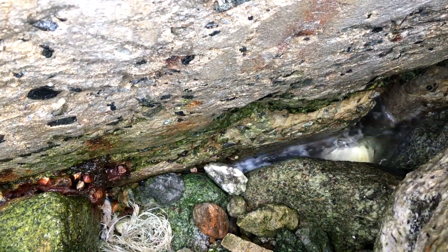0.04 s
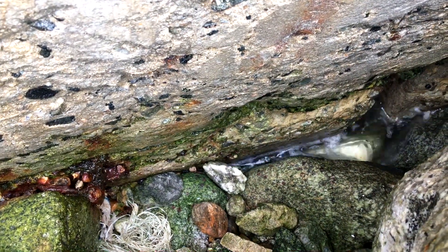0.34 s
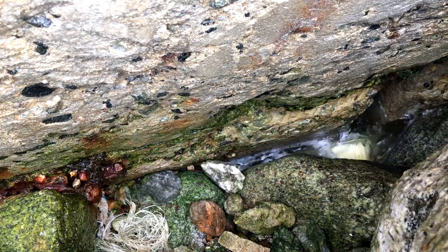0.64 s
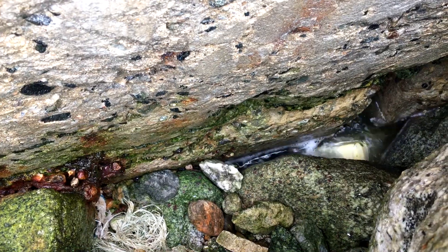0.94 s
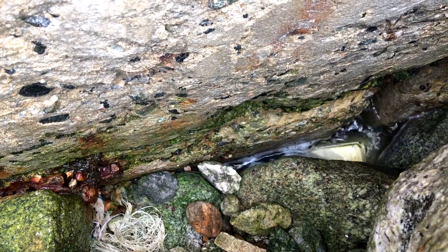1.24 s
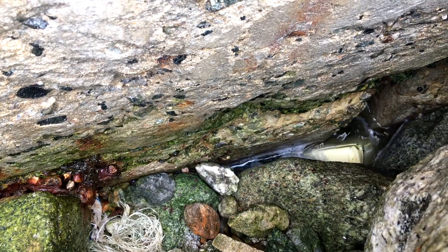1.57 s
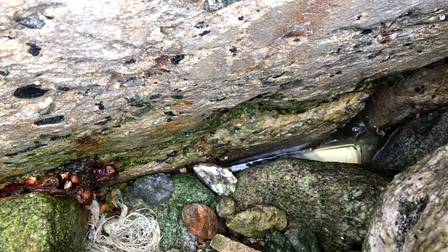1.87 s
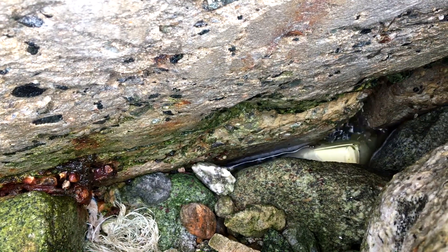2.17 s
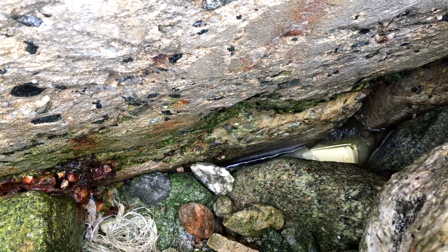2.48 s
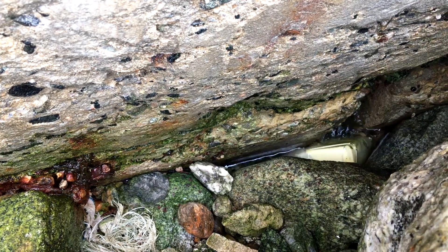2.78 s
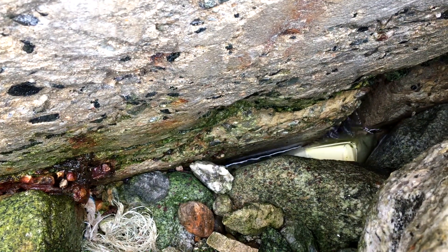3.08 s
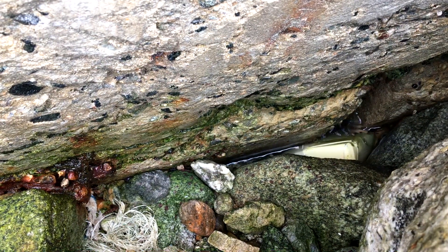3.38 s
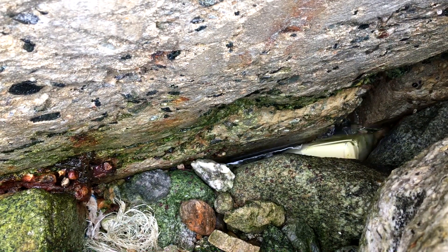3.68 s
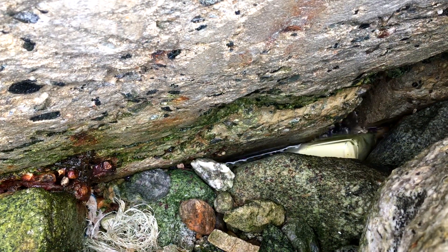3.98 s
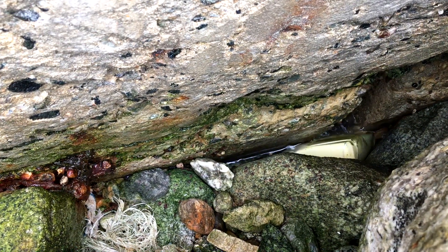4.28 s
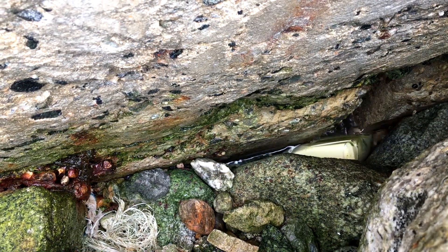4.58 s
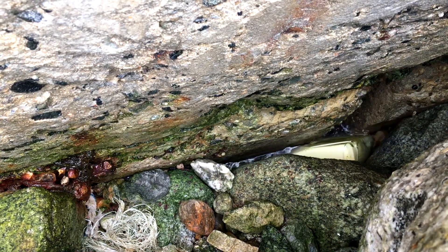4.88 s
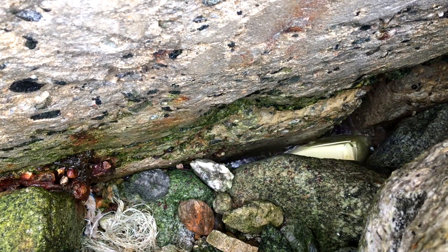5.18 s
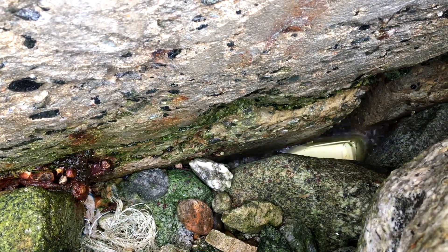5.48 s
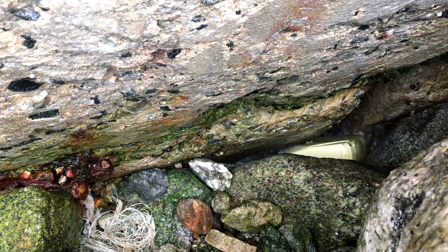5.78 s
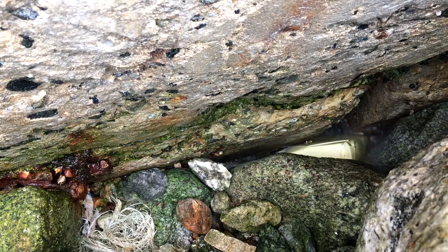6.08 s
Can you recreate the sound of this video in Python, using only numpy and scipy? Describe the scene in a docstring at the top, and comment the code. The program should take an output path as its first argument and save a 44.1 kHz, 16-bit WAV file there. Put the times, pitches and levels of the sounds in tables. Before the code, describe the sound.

Close above a narrow gap between shore boulders, foam fizzes lightly and drops slap on water and stone. A low swell gurgles through the hollows beneath with a rumble and a few deep gulps, then drains away with small plips. Near the end a bigger wave surges in, booming and churning, with splashing and a bright hiss of foam. The open sea is a faint, dull wash behind.

```python
"""Foam fizzes and spits in a narrow cleft between shore boulders, just below the microphone.
A low swell gurgles through the hollows under the rocks and drains away with a few plips; then a bigger
wave surges in, booming and splashing. Turbulent water rings the air in the hollows and in the gap,
clouds of ringing bubbles make the splash and fizz, and drops slap on water and stone.
Farther out, the open sea is a faint, steady wash."""
import sys
import numpy as np
from scipy import signal
from scipy.fft import rfft, irfft, next_fast_len
from scipy.io import wavfile
from scipy.ndimage import uniform_filter1d

SR = 44100
rng = np.random.default_rng(int(sys.argv[2]) if len(sys.argv) > 2 else 0)


def store_wav(level_fs):
    """Save 16-bit WAV to argv[1]."""
    pcm = np.round(np.clip(np.atleast_2d(level_fs), -1, 1) * 32767)
    wavfile.write(sys.argv[1], SR, pcm.T.astype(np.int16))


N = 270465
TIME = np.arange(N) / SR

# the low swell and the big wave, with the levels they rise towards before the trims in scene():
# (arrival [s], rise [s], rumble [dB], boom [dB], churning [dB], splashing [dB], foam [dB])
WAVES = [(0.6, 0.36, -29, -33, -44, -53, -65), (4.783, 0.3, -25, -17.5, -31, -34, -38)]
# water shutting air pockets under the boulders: (time [s], rumble [dB], boom [dB])
GULPS = [(0.06, -42, -66), (0.88, -36, -49), (1.44, -33.5, -31), (2.039, -35, -33.5), (2.68, -38, -45),
         (3.44, -48, -37.5), (3.85, -58, -37.5), (4.97, -29, -34), (6.0, -23, -31.5)]

# resonances: (pitch [Hz], width [Hz], relative level [dB])
HOLLOW_MODES = [(104.65, 15.7, 3), (142, 17, -12.5), (200.8, 22.2, -10), (220.5, 20.5, -14.5)]   # air in the big hollows under the boulders
SURF_MODES = [(52.1, 18.2, -2.5), (65.2, 11.2, 2)]   # the low end of the surf
GAP_LOW_MODES = [(214.8, 32, 2.5), (280, 48.4, 2), (333.6, 32, -1), (432, 64, -11), (514.6, 41, -4),
                 (588.6, 28.5, -1.5), (650.5, 45, -2.5), (740, 13, -22), (950, 75, -16), (1252, 57, -18),
                 (1536, 21, -17)]   # the narrow gap at low water
GAP_FULL_MODES = [(191.7, 25.5, 5.5), (289.5, 42, 1), (324, 39, -3), (420, 33, -2), (504, 26, -10.5),
                  (599, 52, -5.5), (660, 57, -8.5), (806, 53, -15)]   # the gap when the wave fills it
CREVICE_MODES = [(1280, 120, -8.5), (1548, 30, 5.5), (1990, 250, -5), (2800, 50, -19), (3640, 32, 3),
                 (3860, 34, -2)]   # crevices that ring with the splashing at low water

# spectra at the microphone: (frequency [Hz], relative level [dB])
SWELL_COLOUR = [(750, 8), (870, 0), (1200, -1), (1700, -4), (2200, -3.5), (2700, -5.5), (3300, -8.5),
                (4200, -9), (5000, -12.5)]   # splashing at low water
SURGE_COLOUR = [(750, 5), (870, -4), (930, 5), (1020, 3.5), (1120, -1.5), (1700, -0.5), (1850, -3),
                (2200, -3), (2800, -6), (3150, -9), (3800, -8), (4400, -10), (5000, -14)]   # splashing of the incoming wave
FOAM_COLOUR = [(3000, 2.5), (4200, -2), (4900, -2), (6100, 1.5), (7400, -0.5), (8800, 1.5), (9700, 0),
               (10400, -5), (11100, -1.5), (12300, -1.5), (13500, -3), (15600, -3.5)]   # bursting foam
SEA_COLOUR = [(60, -6), (110, 6), (180, -14.5), (280, -27), (380, -15.5), (480, -27.5), (650, -27),
              (900, -26), (1400, -36.5), (2500, -66)]   # the open sea farther out

# the loudest drops on water and stone: (time [s], level [dB], centre [Hz], width [Hz])
SPLATS = [(0.032, -38.5, 1700, 1000), (0.258, -45, 945, 440), (0.299, -38, 4320, 5000),
          (0.3655, -29, 1620, 790), (0.467, -39.5, 1360, 1400), (0.541, -43.5, 4100, 1620),
          (0.582, -43, 1120, 450), (1.592, -40.5, 2470, 3000), (2.142, -50, 4300, 700),
          (2.264, -44, 3400, 900), (2.646, -54, 1250, 700), (2.876, -46.5, 3640, 600),
          (3.222, -46.5, 4800, 4000), (3.298, -44, 5960, 7000), (3.592, -50.5, 6300, 2000),
          (3.913, -50.5, 6400, 1100), (4.163, -53, 2600, 2000), (4.262, -48, 850, 535),
          (4.333, -55, 794, 710), (4.542, -54.5, 4770, 3470), (4.659, -55.5, 4220, 3970),
          (4.907, -47.5, 6200, 3000), (5.356, -34, 11100, 7100)]
# body, smack and spray of each slap: (centre [ratio], width [ratio], relative level [dB], t60 [s])
SLAP_PARTS = [(0.52, 0.55, -9.5, 0.053), (1, 1, -0.5, 0.091), (2.05, 6, -9, 0.15)]
# single large bubbles: (time [s], level [dB], starting pitch [Hz], t60 [s])
PLIPS = [(.366, -32, 3110, 0.053), (1.651, -32.5, 2200, 0.03), (1.765, -40, 2950, 0.046),
         (1.848, -44, 1850, 0.046), (2.452, -31.5, 2800, 0.048), (2.742, -37.5, 1567, 0.049),
         (2.860, -36, 2240, 0.034), (3.298, -46, 1750, 0.085), (3.393, -35, 2510, 0.043),
         (3.709, -28.5, 916, 0.083)]

SURGE_FROM_S, SURGE_FULL_S = 4.39, 5.0   # the big wave fills the gap
BACKWASH_FOAM_DB, BACKWASH_SPLASH_DB, BACKWASH_DB_PER_S = -59, -60, 3   # an earlier wave dying away
CUTOFF_HZ = 15700


def water_levels():
    """Rumble and boom start just ahead of a wave and swell slowly;
    churning and splashing rise quickly as it arrives, foam more gradually."""
    surf, boom, churn, splash, froth = np.transpose(WAVES)[2:]
    surf_db = wave_level(surf, slack_db=-46, slowness=2.1, lead_s=0.16, hold_s=1.22, drain_s=2.11)
    boom_db = wave_level(boom, slack_db=-53.5, slowness=1.64, lead_s=0.14, hold_s=2.47, drain_s=1.4)
    churn_db = wave_level(churn, slack_db=-62)
    splash_db = wave_level(splash, slack_db=-71.5, slowness=0.97, lead_s=0.01, hold_s=2.07, drain_s=1.74)
    foam_db = wave_level(froth, slack_db=-77.5, slowness=1.46, hold_s=2.17, drain_s=1.36)
    gulp_surf_db, gulp_boom_db = gulps()
    fade_db = BACKWASH_DB_PER_S * TIME
    return (power_sum(surf_db, gulp_surf_db), power_sum(boom_db, gulp_boom_db), churn_db,
            power_sum(splash_db, BACKWASH_SPLASH_DB - fade_db),
            power_sum(foam_db, BACKWASH_FOAM_DB - fade_db))


def wave_level(heights_db, slack_db, slowness=1, lead_s=0, hold_s=2.025, drain_s=1.52):
    """Each wave lifts a sound from its slack-water level, fast at first; it holds, then drains away."""
    level_db = slack_db
    for (arrives_s, rise_s, *_), height_db in zip(WAVES, heights_db):
        age = np.maximum(TIME - arrives_s + lead_s, 0)
        filling = 1 - np.exp(-age / (rise_s * slowness))
        draining = np.clip(1 - (age - hold_s) / drain_s, 0, 1)
        level_db = level_db + (height_db - slack_db) * filling * draining
    return level_db


def gulps(swell_s=0.044):
    """Levels of rumble and boom as each air pocket is squeezed and let go."""
    times, *levels_db = np.transpose(GULPS)
    swells = np.exp(-((TIME - times[:, None]) / swell_s) ** 2 / 2)
    return [20 * np.log10(from_db(db) @ swells + 1e-9) for db in levels_db]


def cavity(modes, even_s):
    """Turbulent water drives each air resonance of a hollow."""
    run_in = SR // 4
    rings = 0
    for hz, width_hz, db in modes:
        turbulence = rng.standard_normal(N + run_in)
        stage_hz = 1.53 * width_hz   # two stages in a row narrow back to about width_hz
        rings += from_db(db) * resonate(resonate(turbulence, hz, stage_hz), hz, stage_hz)
    return steady(rings[run_in:], even_s)


def rumble(surf_db):
    """The harder the swell pushes, the more of its power goes to the deeper resonance."""
    deep, upper = SURF_MODES
    deep_share = np.interp(surf_db, [-46, -37], [0.3, 0.75])
    return blend(cavity([deep], even_s=0.089), cavity([upper], even_s=0.083), deep_share)


def churning(surf_db, surge):
    """The gap rings with the water in it; at low water a hard push brings out its deepest resonance."""
    deepest, *others = GAP_LOW_MODES
    deep_share = np.interp(surf_db, [-46, -35], [0.1, 0.45])
    low_water = blend(cavity([deepest], even_s=0.12), cavity(others, even_s=0.19), deep_share)
    return blend(cavity(GAP_FULL_MODES, even_s=0.33), low_water, surge)


def splashing(splash_db, surge):
    """Bubbles over a wash of spray; stronger flow makes more, and the big wave drowns the crevices."""
    per_s = 2400 * from_db(0.31 * (splash_db + 55.5))
    bubbles = steady(bubble_cloud(per_s, 913, 5940, cycles=15.5, spread_db=6.5), span_s=0.24)
    spray = from_db(6.5) * rng.standard_normal(N)
    water = (bubbles + spray) * from_db(0.58 * drift(rate_hz=3))
    ringing = water + sum(from_db(db) * resonate(water, hz, width) for hz, width, db in CREVICE_MODES)
    return blend(colour(water, SURGE_COLOUR), colour(ringing, SWELL_COLOUR), surge)


def foam(foam_db):
    """Tiny bubbles burst in a fine hiss, more of them as the foam builds."""
    per_s = 2600 * from_db(0.7 * (foam_db + 62.5))
    fizz = steady(bubble_cloud(per_s, 3830, 13500, cycles=15, spread_db=5.0), span_s=0.15)
    hiss = from_db(5.5) * rng.standard_normal(N)
    return colour((fizz + hiss) * from_db(0.5 * drift(rate_hz=30)), FOAM_COLOUR)


def bubble_cloud(per_s, low_hz, high_hz, cycles, spread_db, count=40):
    """Bubbles of every size are born at random and ring briefly; most are faint, a few stand out."""
    strengths = from_db(spread_db * np.minimum(rng.exponential(1, N), 4.5)) * rng.choice([-1, 1], N)
    births = strengths * (rng.random(N) < per_s / SR)
    pitch_index = rng.integers(0, count, N)
    places = np.zeros((4, N))   # spots along the cleft, each with reflections of its own
    for k, hz in enumerate(np.geomspace(low_hz, high_hz, count)):
        places[k % len(places)] += resonate(births * (pitch_index == k), hz, 2 * hz / cycles)
    return rms_one(sum(signal.oaconvolve(place, rock_echo(t60=0.13, wet_db=7))[:N] for place in places))


def splats(contact_s=0.00084, onset_s=0.0005):
    """Each drop flattens over a millisecond or two, and its slap rattles briefly between the rocks."""
    out, t = np.zeros(N), TIME[:SR // 6]
    for start_s, db, centre_hz, spread_hz in SPLATS + drips():
        for pitch, breadth, part_db, t60 in SLAP_PARTS:
            hz, width_hz = min(pitch * centre_hz, CUTOFF_HZ), min(breadth * spread_hz, CUTOFF_HZ / 2)
            envelope = (1 - np.exp(-t / onset_s)) * (3 * np.exp(-t / contact_s) + from_db(-60 * t / t60))
            burst = envelope * rng.standard_normal(len(t))
            slap = resonate(resonate(burst, hz, width_hz), hz, width_hz)
            if start_s < TIME[-1]:
                add(out, start_s, from_db(db + part_db) * slap / np.abs(slap).max())
    return out


def plips(rise=0.031, onset_s=0.0077, wobble=0.022):
    """A trapped bubble rings; its pitch wavers and rises as it nears the surface."""
    out, t = np.zeros(N), TIME[:SR // 6]
    for start_s, db, hz, t60 in PLIPS:
        pitch_hz = hz * (1 + 2 * rise * t / t60 + wobble * drift(rate_hz=90)[:len(t)])
        envelope = from_db(db - 60 * t / t60) * (1 - np.exp(-t / onset_s))
        ring = envelope * np.sin(2 * np.pi * np.cumsum(pitch_hz) / SR)
        add(out, start_s, signal.fftconvolve(ring, rock_echo(t60=0.12, wet_db=-9)))
    return out


def drips(count=60, per_s=4.7, start_db=-44.5, fade_db_per_s=2.3, low_hz=1000, high_hz=10000):
    """Faint drops run off the rocks at random, weaker as the rocks drain; rows as in SPLATS."""
    wait, pitch = rng.random((count, 2)).T
    times = np.cumsum(-np.log(1 - wait)) / per_s
    hz = low_hz * (high_hz / low_hz) ** pitch
    return list(zip(times, start_db - fade_db_per_s * times, hz, 0.38 * hz))


def spatter():
    """Loose droplets thrown off the foam patter on the stones."""
    return colour(bubble_cloud(100, 2100, 15000, cycles=5.3, spread_db=10.5, count=16), FOAM_COLOUR)


def rock_echo(t60, wet_db):
    """The direct path to the microphone, then quickly dying reflections between the rock faces."""
    t = TIME[:SR // 6]
    echoes = rng.standard_normal(len(t)) * from_db(-60 * t / t60) * (t > 0.0005)
    return (t == 0) + from_db(wet_db) * echoes / np.linalg.norm(echoes)


def open_sea():
    """The sea beyond the boulders, a dull and steady wash at this distance."""
    return colour(rng.standard_normal(N), SEA_COLOUR)


def from_db(db):
    return 10 ** (np.asarray(db) / 20)


def rms_one(x):
    return x / np.sqrt(np.mean(x ** 2) + 1e-20)


def power_sum(*levels_db):
    """The level of several sounds together."""
    return 10 * np.log10(sum(from_db(db) ** 2 for db in levels_db))


def blend(first, second, share):
    """Gives the first sound its share of the power and the second the rest."""
    return np.sqrt(share) * first + np.sqrt(1 - share) * second


def drift(rate_hz, step=40, run_in=2000):
    """A smooth random wander of rms about 1."""
    r = np.exp(-2 * np.pi * rate_hz * step / SR)
    noise = rng.standard_normal(N // step + run_in + 2)
    slow = signal.lfilter([1], [1, -2 * r, r * r], noise)[run_in:]
    return np.interp(np.arange(N) / step, np.arange(len(slow)), rms_one(slow))


def steady(x, span_s):
    """Evens out slow swings of level; rms about 1."""
    return x / np.sqrt(np.abs(uniform_filter1d(x ** 2, int(span_s * SR))) + 1e-20)


def resonate(x, hz, width_hz):
    """One resonance with gain 1 at its peak."""
    r = np.exp(-np.pi * width_hz / SR)
    feedback = [1, -2 * r * np.cos(2 * np.pi * hz / SR), r * r]
    return signal.lfilter(np.array([1, 0, -1]) * (1 - r * r) / 2, feedback, x + 1e-18)


def colour(x, spectrum):
    """Shapes a sound by a spectrum that falls away beyond its ends; rms 1."""
    hz, db = np.transpose(spectrum)
    f = np.maximum(np.fft.rfftfreq(2 * N, 1 / SR), 1)
    skirts = 1 / np.sqrt((1 + (hz[0] / f) ** 8) * (1 + (f / hz[-1] / 1.2) ** 8))
    shape = skirts * from_db(np.interp(np.log(f), np.log(hz), db))
    size = next_fast_len(2 * N)
    gain = np.interp(np.fft.rfftfreq(size, 1 / SR), f, shape)
    return rms_one(irfft(rfft(x, size) * gain, size)[:N])


def add(out, start_s, sound):
    """Lays a short sound in at its moment."""
    at = round(start_s * SR)
    out[at:at + len(sound)] += sound[:N - at]


def scene():
    """From just above: rumble and boom below, churning in the gap, spray close by, the sea behind."""
    surf_db, boom_db, churn_db, splash_db, foam_db = water_levels()
    surge = np.interp(TIME, [SURGE_FROM_S, SURGE_FULL_S], [0, 1])
    sea = from_db(-48.5) * open_sea()
    boom = from_db(boom_db - 0.5) * cavity(HOLLOW_MODES, even_s=0.13)
    churn = from_db(churn_db + 2) * churning(surf_db, surge)
    spray = from_db(splash_db - 0.36) * splashing(splash_db, surge)
    fizz = from_db(foam_db + 0.85) * foam(foam_db)
    patter = from_db(foam_db - 10) * spatter()
    surf = from_db(surf_db) * rumble(surf_db)
    return (boom + surf + churn + spray + fizz + patter + splats() + plips() + sea)[None]


def record(dry):
    """One microphone over the cleft, with the deepest bass and the very top cut."""
    low_cut = signal.butter(6, 34, "high", fs=SR, output="sos")
    high_cut = signal.ellip(14, 0.1, 90, CUTOFF_HZ, fs=SR, output="sos")
    return signal.sosfilt(high_cut, signal.sosfilt(low_cut, dry))


dry = scene()
out = record(dry)
store_wav(out)
```